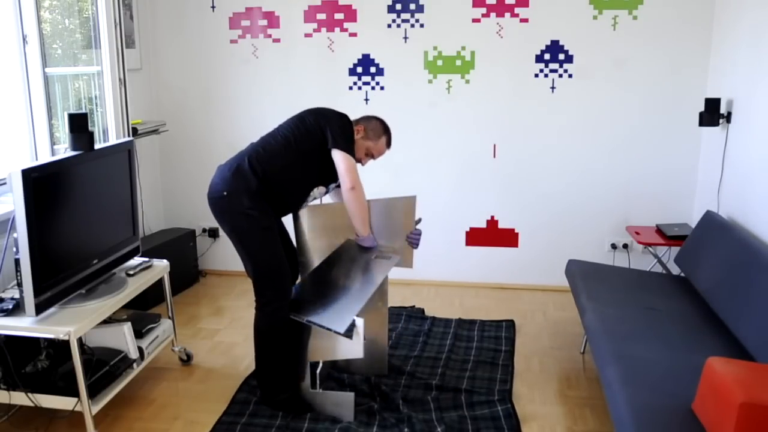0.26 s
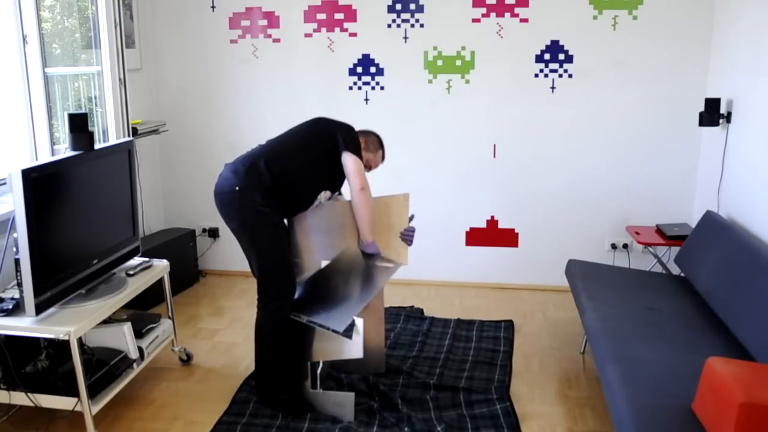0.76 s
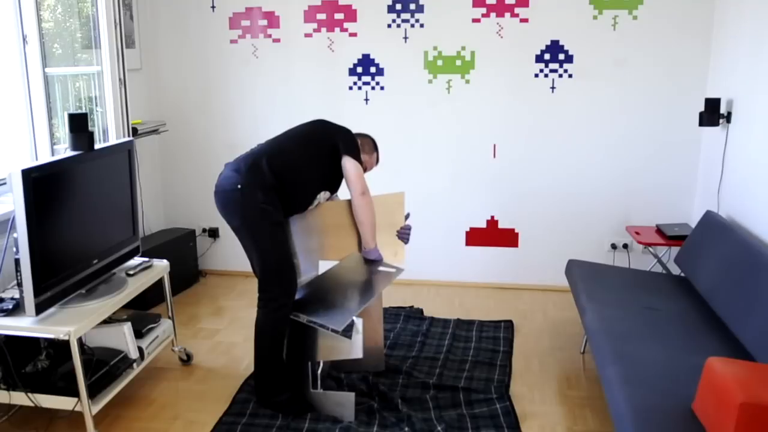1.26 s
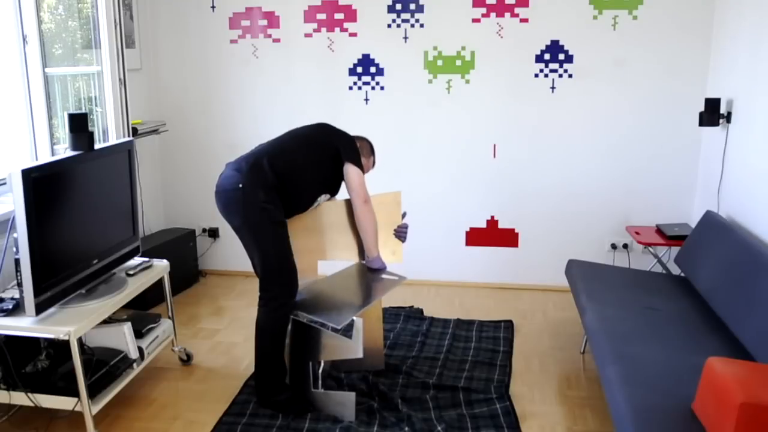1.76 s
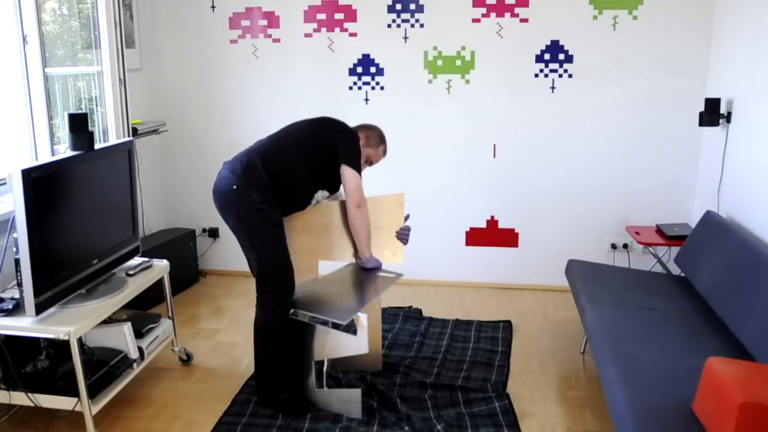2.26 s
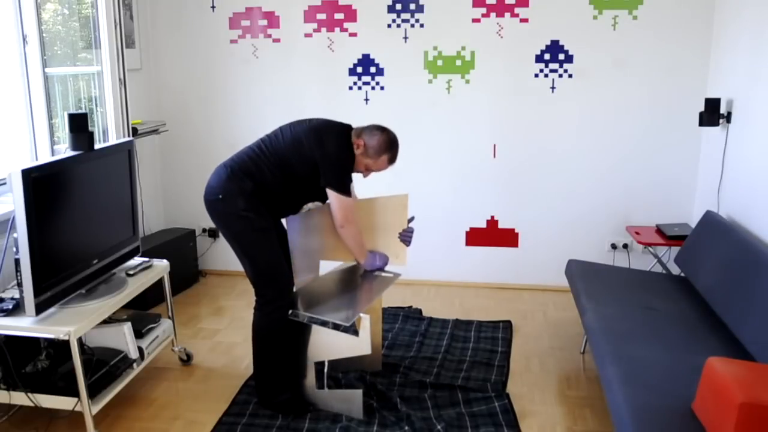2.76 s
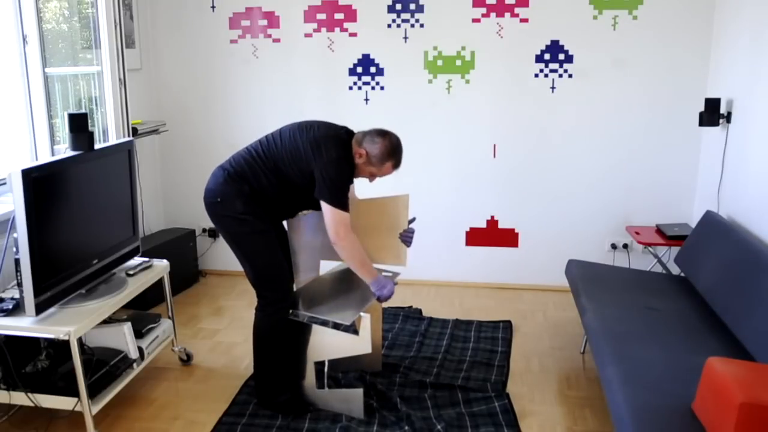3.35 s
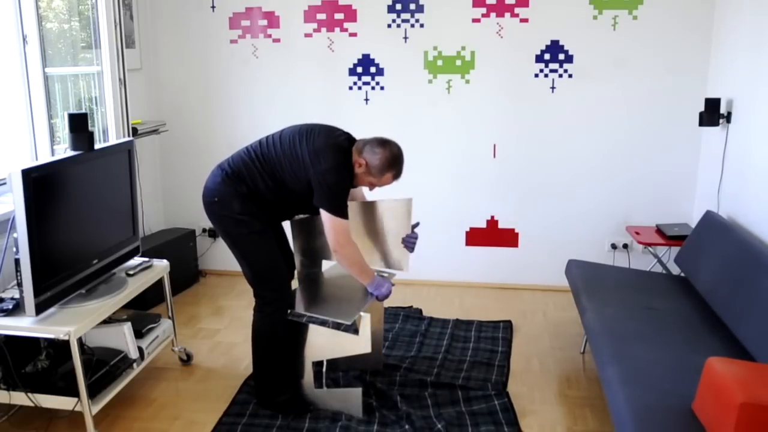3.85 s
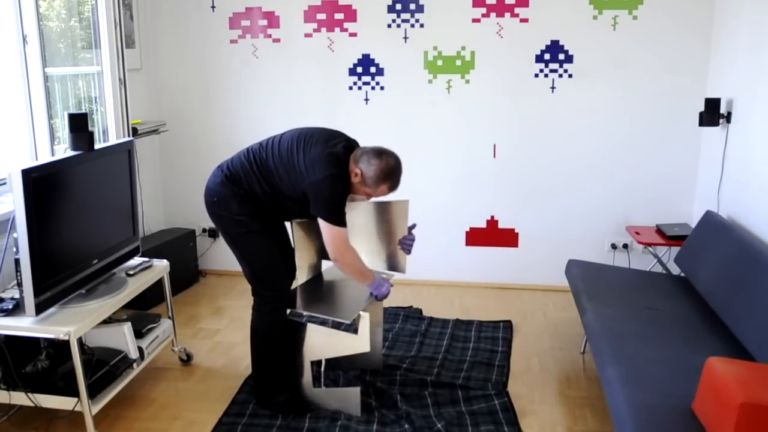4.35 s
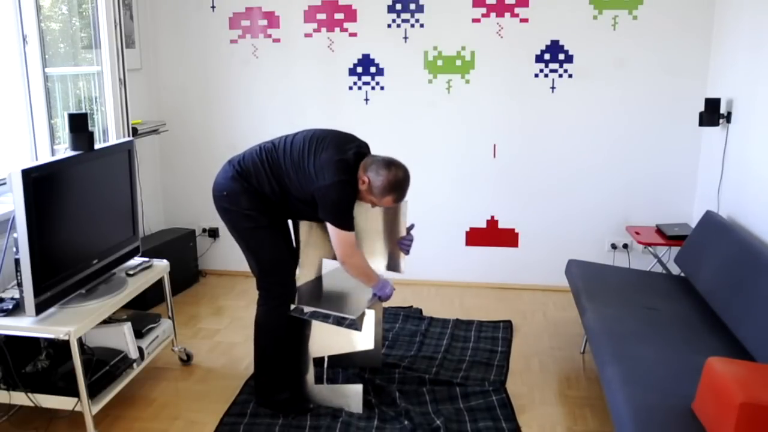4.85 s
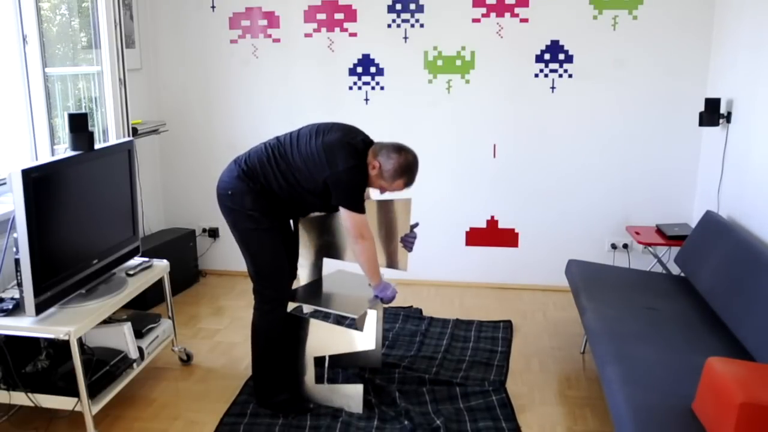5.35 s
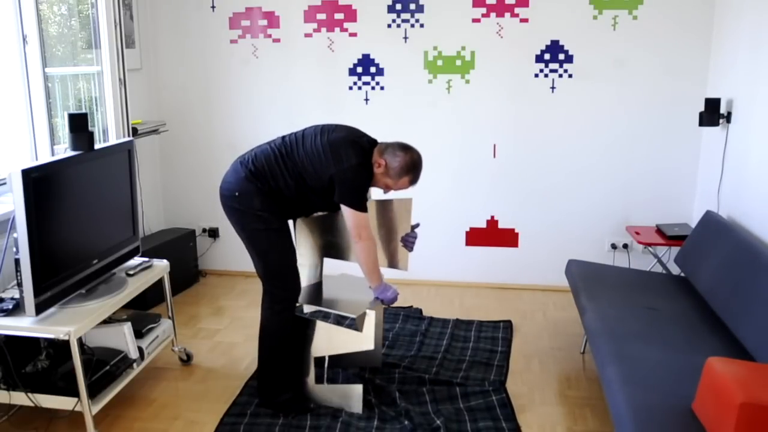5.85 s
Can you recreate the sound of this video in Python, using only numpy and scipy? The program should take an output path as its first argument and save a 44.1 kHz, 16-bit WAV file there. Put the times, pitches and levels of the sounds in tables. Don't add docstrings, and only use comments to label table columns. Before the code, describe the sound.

Sheet-metal panels scrape, click and knock under handling, their short metallic ring growing stronger until two harsh crashes burst out near the end.

```python
import sys
import numpy as np
from scipy import signal
from scipy.fft import rfft, irfft, next_fast_len
from scipy.io import wavfile

SR = 44100
rng = np.random.default_rng(int(sys.argv[2]) if len(sys.argv) > 2 else 0)


def amplitude_ratio(level_db):
    exponent = np.asarray(level_db, float) / 20
    return 10 ** exponent


def waveform_to_disk(signal):
    frames = np.transpose(np.atleast_2d(signal))
    scaled = np.clip(frames, -1, 1) * 32767
    samples = np.round(scaled).astype(np.int16)
    wavfile.write(sys.argv[1], SR, samples)


N = 269451
PAD = next_fast_len(N + SR)
FOLD_HZ = SR / 8

# (centre [Hz], decay of plate and room t60 [s])
RANGES = [(200, 0.67), (650, 0.46), (1500, 0.6), (3300, 0.5)]


def panels():
    # (frequency [Hz], level [dB])
    radiation = [(25, -18.5), (60, -19.5), (120, -2.5), (250, 4.5), (800, 2.5), (2000, 1), (3200, -2.5),
                 (4000, -9), (4600, -17.5), (5100, -27.5), (5500, -49)]
    centre, t60 = np.transpose(RANGES)
    memory = t60 * SR / np.log(1e6)

    hz = np.arange(PAD // 2 + 1) * SR / PAD
    share = np.array([np.interp(np.log(hz + 1), np.log(centre), row) for row in np.eye(4)])
    share = np.sqrt(share) * amplitude_ratio(at_hz(radiation, hz)) * (hz < FOLD_HZ)
    share /= np.sqrt(np.mean(share ** 2, axis=1) * memory)[:, None]
    drive = rfft(forces(memory), PAD) * share

    t = np.arange(SR) / SR
    dying = amplitude_ratio(-60 * t / t60[:, None])
    dying *= 1 - 0.3 * np.exp(-t / 0.009)
    dying *= 1 + 0.32 * np.exp(-t / 0.018)
    dense = rfft(mode_crowd(standing_out=0.025, rise_db=14.5) * dying, PAD)
    ringing = irfft((drive * dense).sum(axis=(0, 1)), PAD)[:N] * amplitude_ratio(-3.5)

    pushed = irfft(drive.sum(axis=1), PAD)[:, :N]
    joined = pushed + 1.02 * pushed.sum(axis=0)
    return ringing + strong_modes(joined / 1.88)


def forces(memory):
    # (start [s], hold [s], level [dB], brightness [dB/octave], focus [dB/octave^2])
    strokes = [(0.005, 0.027, -34, 3.5, 1.06), (.2, 0.034, -41, 1, 1.5), (.46, .12, -38, 0.7, -0.57),
               (.76, .04, -29, 6.5, 1.6), (.87, 0.044, -25.5, 3.1, 0.5), (.98, 0.12, -31.5, 4, 1.94),
               (1.3, 0.038, -41.5, 0.5, -0.4), (1.53, 0.045, -36.5, 5, 0.3), (1.63, 0.062, -25, 1.5, 0.6),
               (1.79, 0.027, -22.5, 2.5, 1.8), (1.85, 0.016, -26.5, 1.9, 2.5), (2.19, 0.1, -28.5, -1, 0.8),
               (2.74, 0.013, -22, 3, 3), (3.07, 0.018, -23.5, 0.8, 11.5), (3.52, 0.024, -49.5, 1.2, 5),
               (3.62, 0.016, -17, 4, 2.5), (3.74, 0.16, -40, -0.9, -0.8), (4.29, 0.039, -37.5, -1.5, -0.8),
               (4.39, 0.037, -27, -3.2, 4.5), (4.61, 0.049, -32.5, 0.3, -0.1),
               (4.83, 0.063, -22.5, -1.5, -0.3), (5.05, 0.026, -14, 7, 8), (5.16, 0.01, -22, 1.7, 2),
               (5.38, .03, -45.5, -1.5, -0.5)]
    # (start [s], hold [s], level [dB], brightness [dB/octave],
    # focus [dB/octave^2])
    crashes = [
        (5.628, .04, -20, -2, -1),
        (5.675, 0.064, -1.5, 4, 4),
        (5.78, .02, -18, -2, 2.5),
        (5.89, 0.043, -2, -4, 2.5),
        (6.0, 0.11, -18, -5, 16),
    ]
    # (level [dB], brightness [dB/octave], focus [dB/octave^2])
    handling = (-45.5, -0.25, 0.9)
    # (time [s], ring level [dB], brightness [dB/octave], focus [dB/octave^2])
    snaps = [(.009, -50, -8, -1.1), (0.09, -36.5, 0.5, 3.5), (0.28, -43.5, 5, 1.5), (.35, -37, -2.5, -0.1),
             (.47, -26, 4, 11), (1.292, -40, 1.5, 1), (1.418, -33.5, 1.1, 0.5), (2.159, -12.5, -0.6, 4),
             (2.256, -25.5, -0.1, 0.9), (2.562, -32.5, -0.2, 1), (2.705, -21, 0.85, 0),
             (2.885, -25, -1, 0.7), (2.996, -19.5, -1.5, 1.6), (3.02, -26, -3, 4), (3.238, -43, 1.5, 0.5),
             (3.46, -32, 0.5, -2.1), (4.012, -37, 1.5, 0.1), (4.354, -15.5, -0.2, 2.5), (4.782, -12, 3, 2),
             (5.035, -12, -4, 0.94), (5.633, -24.5, -6.5, 1.4), (5.672, -7, -1.5, -0.8),
             (5.886, -11, -1.45, -0.16)]
    # (time [s], ring level [dB], brightness [dB/octave], focus [dB/octave^2])
    skids = [(.752, -41, .2, -1), (.878, -41, 5, 2), (1.105, -25, 7.5, 5.1), (1.472, -31, 3, 1),
             (1.596, -20.5, 5.5, 2.5), (1.852, -36.5, -4.5, -3), (2.616, -26.5, -3.5, 1.1),
             (3.572, -46.5, 0, -6), (3.609, -24, 1.5, 0), (3.773, -26, 1, 2), (4.58, -31.5, -2.5, -0.4),
             (4.937, -9.5, -3, 1), (5.19, -25, -11, 3.1), (2.537, -36.5, 7.5, 3), (4.143, -38, 1.2, .2),
             (4.204, -31, -3.7, 0.2), (4.556, -30, 0, -1.1)]

    judder = amplitude_ratio(3.5 * drift(30, count=1))
    power = pressure(strokes, rise_db=161, fall_db=164, sag_db=0)
    power += by_range(*handling)[:, None] ** 2
    power += pressure(crashes, rise_db=892.5, fall_db=299.5, sag_db=78.5)
    force = grit(per_s=2500, spread_db=3.5, count=3)[:, None] * np.sqrt(power / 3) * judder

    slides = np.hanning(1000) * rng.standard_normal((len(skids), 1000))
    for k, (at, *colour) in enumerate(skids + snaps):
        if k < len(skids):
            contact = slides[k] / np.linalg.norm(slides[k])
        else:
            contact = np.ones(1)
        start = round(at * SR) - len(contact) // 4
        blow = by_range(*colour) * np.sqrt(memory)
        force[k % 3, :, start:start + len(contact)] += blow[:, None] * contact
    return force


def grit(per_s, spread_db, count):
    sizes = amplitude_ratio(spread_db * np.minimum(rng.exponential(1, (count, N)), 5))
    sizes *= rng.choice([-1, 1], (count, N))
    slips = sizes * (rng.random((count, N)) < per_s / SR)
    return slips / np.std(slips)


def pressure(rows, rise_db, fall_db, sag_db):
    t = np.arange(0, N, 32) / SR
    power = np.zeros((len(RANGES), len(t)))
    for start, hold, *colour in rows:
        shape_db = -rise_db * np.maximum(start - t, 0)
        shape_db -= sag_db * np.maximum(t - start, 0)
        shape_db -= fall_db * np.maximum(t - start - hold, 0)
        power += (by_range(*colour)[:, None] * amplitude_ratio(shape_db)) ** 2
    return np.repeat(power, 32, axis=1)[:, :N]


def by_range(level_db, bright_db, focus_db):
    octaves = np.log2(np.array(RANGES)[:, 0] / 800)
    return amplitude_ratio(level_db + bright_db * octaves - focus_db * octaves ** 2)


def mode_crowd(standing_out, rise_db):
    shape = (3, 1, SR // 2 + 1)
    prominent = (rng.random(shape) < standing_out) * (np.arange(shape[2]) > 400)
    phase = 2 * np.pi * rng.random(shape)
    crowd = irfft(amplitude_ratio(rise_db * prominent) * np.exp(1j * phase), SR)
    return crowd / np.std(crowd)


def strong_modes(pushed):
    fold_starts = [
        0,
        2.14,
        2.52,
        2.98,
        3.44,
        4.76,
        5.58,
    ]
    mode_t60 = [0.36, 0.42, 0.45, 0.42, 0.27, 0.25, 0.57]
    # (frequency [Hz], level [dB])
    first = [(298, -11.5), (594, -2), (740, -3), (1157, -1.5), (1431, 3.5), (1806, -6.5), (1857, 1.5),
             (1908, -12), (2091, 3), (2680, -0.5), (3055, -2.5), (3254, 5), (3730, -13), (4169, -1)]
    # (frequency [Hz], level [dB])
    second = [(228, -12.5), (293, -11), (495, -19), (737, -1.5), (966, 2), (1168, 3), (1224, 3.5),
              (1456, -10), (1499, 7.5), (1749, 3), (2164, 0.5), (2309, -13), (2995, -7), (3264, -3)]
    # (frequency [Hz], level [dB])
    pressed = [(230, -4.5), (297, -6), (497, -3.5), (786, -1), (1263, 3.5), (1500, 0), (1760, 1.5),
               (2250, 0), (2520, -6), (2995, -0.5), (3264, 1), (4050, -3)]
    # (frequency [Hz], level [dB])
    third = [(258, -2.5), (344, 0), (411, -14), (519, -6.5), (820, 6), (925, -11), (1149, 3.5), (1370, 2.5),
             (1440, 1.5), (1633, 9), (1827, 1.5), (1972, -13), (2193, -4), (2699, -3)]
    # (frequency [Hz], level [dB])
    fourth = [(317, -3.5), (597, -3.5), (656, 5), (1197, 2), (1248, -20), (1426, -9.5), (1545, 0.5),
              (1658, 1.5), (1822, 2.5), (2565, -14), (2847, 1), (3068, -0.5), (3219, 4), (3711, -12)]
    # (frequency [Hz], level [dB])
    fifth = [(315, -8.5), (525, -5.5), (719, -2), (880, -7.5), (1204, 1.5), (1230, -7.5), (1515, 0.5),
             (1733, -0.5), (1622, -10), (2125, 7.5), (2370, -14), (2615, 1.5), (3884, -9), (4100, 3.5)]
    # (frequency [Hz], level [dB])
    last = [(684.4, -8), (741.1, 0.5), (853, -11), (952, -1.5), (1185, 1.5), (1573, 3.5), (1480, -1.5),
            (1735, 2), (1850, 2), (2170, -2.5), (3180, -5.5), (3290, 5), (3510, -0.5), (3910, 2.5)]

    crease = np.searchsorted(fold_starts, np.arange(N) / SR, side="right") - 1
    coupling = amplitude_ratio(2.62 * drift(2.914, count=22))
    out = np.zeros(N)
    for c, modes in enumerate([first, second, pressed, third, fourth, fifth, last]):
        for k, (hz, db) in enumerate(modes):
            push = pushed[k % 3] * coupling[k] * amplitude_ratio(db - 19.0) * (crease == c)
            t60 = mode_t60[c] * (1000 / hz) ** 0.15
            out += (-1) ** k * ring(push, hz, t60)
    return out


def ring(drive, hz, t60):
    r, w = amplitude_ratio(-60 / (t60 * SR)), 2 * np.pi * hz / SR
    return signal.lfilter([0, np.sin(w)], [1, -2 * r * np.cos(w), r * r], drive + 1e-18)


def drift(rate, count):
    knots = rng.standard_normal((count, 200))
    place = np.arange(N) / SR * rate
    return np.array([np.interp(place, np.arange(200), k) for k in knots])


def at_hz(points, hz):
    known_hz, value = np.transpose(points)
    return np.interp(np.log(hz + 1), np.log(known_hz), value)


def flicks():
    # (time [s], frequency [Hz], level [dB], t60 [s])
    edge_flicks = [(.055, 2560, -40, .15), (.352, 2500, -32, 0.13), (3.05, 345.3, -22, 0.59),
                   (3.171, 3200, -35, 0.063), (3.238, 3030, -38, 0.073), (4.014, 3010, -34, .25),
                   (4.585, 2176, -22, 0.13), (4.784, 1515, -18.5, 0.42), (5.037, 506, -9.5, 0.35),
                   (5.625, 420, -14.5, 0.28), (5.69, 1870, -3.5, .35), (5.89, 1434, -12, 0.5),
                   (5.905, 951, -8.5, 0.6)]
    out = np.zeros(N)
    for at, hz, db, t60 in edge_flicks:
        start = round(at * SR)
        tap = np.zeros(N - start)
        tap[:60] = np.hanning(60) * np.cos(2 * np.pi * hz * np.arange(60) / SR) * amplitude_ratio(db) / 15
        out[start:] += ring(tap, hz, t60)
        out[start:] += 0.63 * ring(tap, hz * 0.7, t60)
        out[start:] -= 0.71 * ring(tap, hz * 1.07, t60)
    return out


def floor_boards():
    # (time [s], level [dB], frequency [Hz])
    thumps = [(1.419, -35, 51.4), (1.68, -36, 48.2), (1.87, -33, 103.4), (2.17, -33, 89.5),
              (3.02, -31, 71.4), (3.6, -39, 60.3), (4.3, -35, 52), (4.6, -39, 50)]
    push_s, t60 = 0.022, 0.45
    push = np.hanning(round(push_s * SR))
    t = np.arange(len(push)) / SR
    out = np.zeros(N)
    for at, db, hz in thumps:
        start = round(at * SR)
        tap = np.zeros(N - start)
        tap[:len(push)] = push * np.sin(2 * np.pi * hz * t) * amplitude_ratio(db) * 4 / len(push)
        out[start:] += ring(tap, hz, t60) + 0.36 * ring(tap, 0.45 * hz, t60)
    return out


def air():
    # (frequency [Hz], level [dB/Hz])
    air_spectrum = [(20, -11), (50, 9), (100, 11), (300, 5), (800, 4.5), (1600, 1), (3000, -30),
                    (4400, -13.5), (5500, -45)]
    hz = np.arange(PAD // 2 + 1) * SR / PAD
    noise = rfft(rng.standard_normal(PAD))
    tone = irfft(noise * amplitude_ratio(at_hz(air_spectrum, hz)) * (hz < FOLD_HZ), PAD)[:N]
    level_db = -38.5 + 1.07 * drift(13.0, count=1)[0]
    return amplitude_ratio(level_db) * tone / np.std(tone)


def scene():
    return (panels() + flicks() + floor_boards() + air())[None]


def low_pass(x):
    return signal.sosfilt(signal.butter(12, 15800, fs=SR, output="sos"), x)


def record(dry):
    # (distance above the fold [Hz], level [dB])
    mirror = [(12, -0.5), (500, -6), (1000, -13), (2000, -25), (3000, -35.5), (4500, -55.5)]
    size = 8 * (PAD // 8)
    band = rfft(np.clip(dry[0], -1.05, 1.05), size)
    fold = size // 8
    band[fold:] = 0
    leak = amplitude_ratio(at_hz(mirror, np.arange(fold) * SR / size))
    band[fold + 1:2 * fold + 1] = np.conj(band[:fold][::-1]) * leak
    played = irfft(band, size)

    slips = np.arange(0.0935, N / SR, 0.1067)
    slips = slips + rng.uniform(-0.008, 0.008, len(slips))
    shift = np.searchsorted(slips, np.arange(N) / SR) % 2
    slipped = played[np.arange(N) + 2 * shift]

    smooth = signal.butter(3, 9000, fs=SR, output="sos")
    hot = signal.sosfiltfilt(smooth, slipped)
    clipped = 0.965 * hot / (1 + np.abs(hot) ** 24) ** (1 / 24)
    cut = signal.butter(2, 13000, fs=SR, output="sos")
    mix = signal.sosfilt(cut, clipped)[None]
    return low_pass(mix)


dry = scene()
out = record(dry)
waveform_to_disk(out)
```